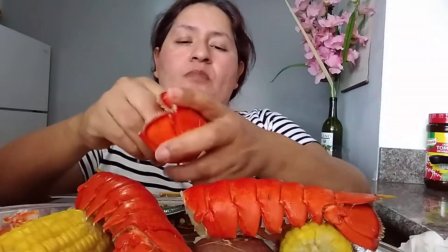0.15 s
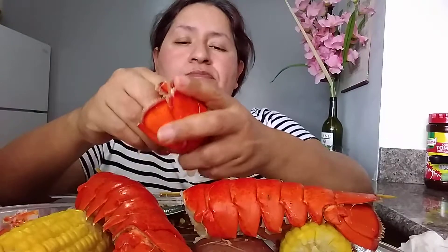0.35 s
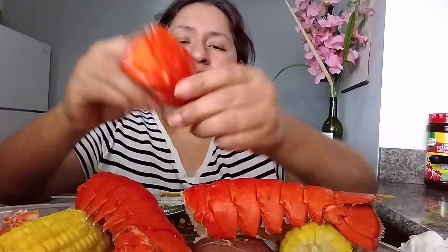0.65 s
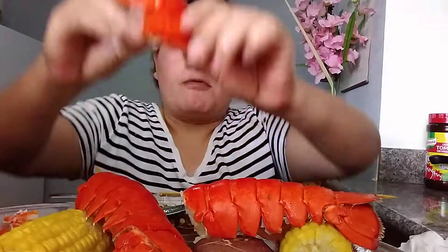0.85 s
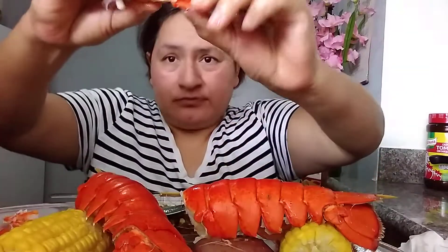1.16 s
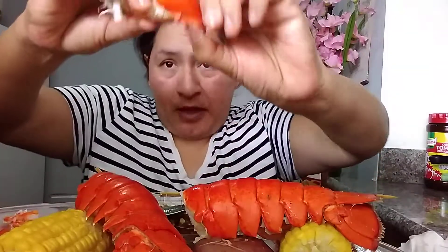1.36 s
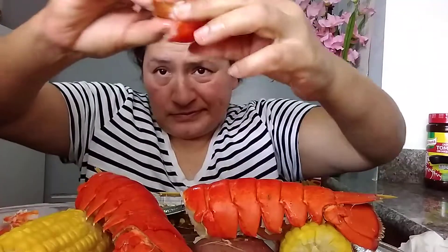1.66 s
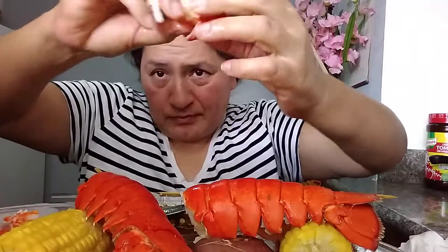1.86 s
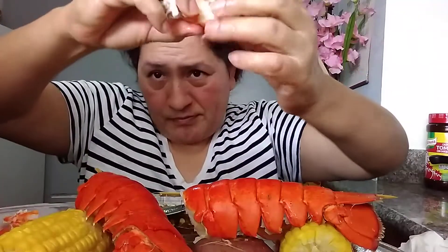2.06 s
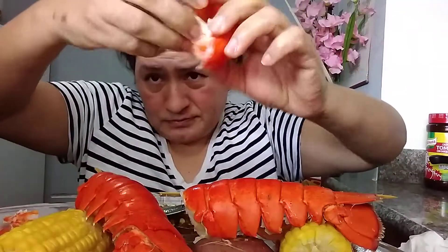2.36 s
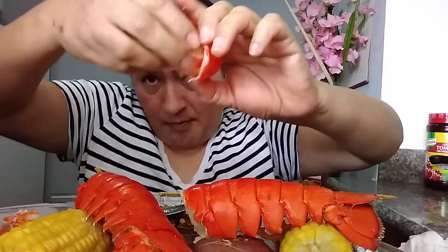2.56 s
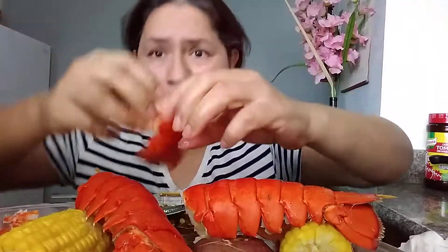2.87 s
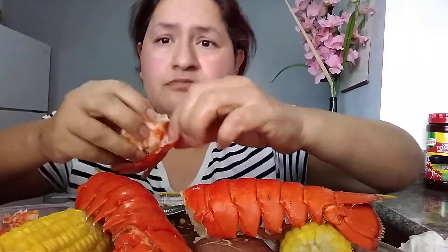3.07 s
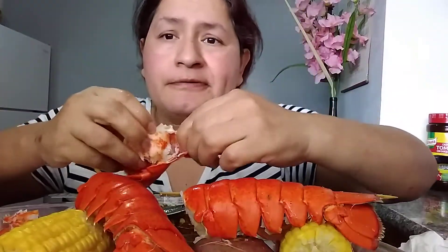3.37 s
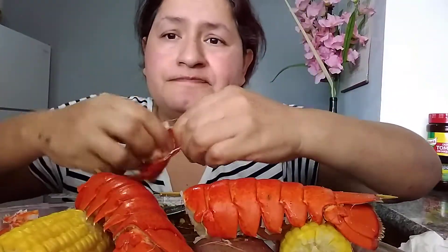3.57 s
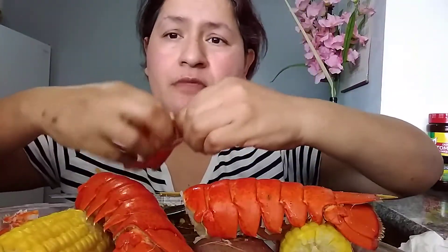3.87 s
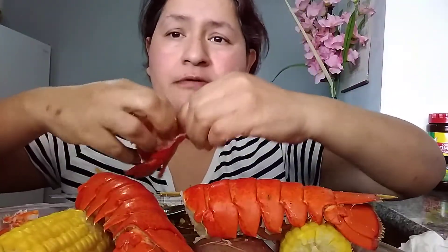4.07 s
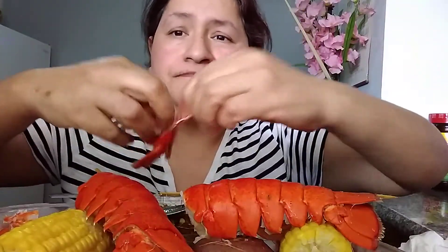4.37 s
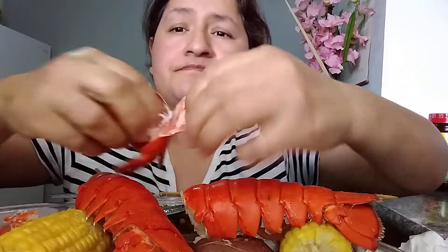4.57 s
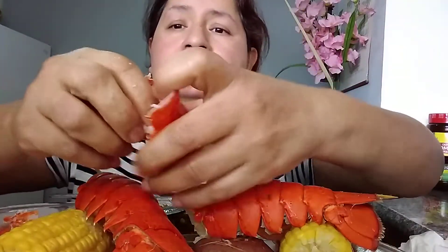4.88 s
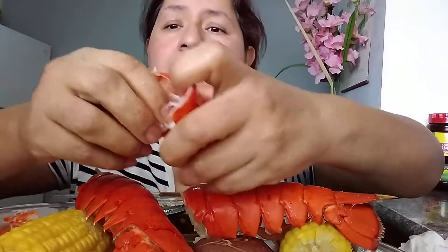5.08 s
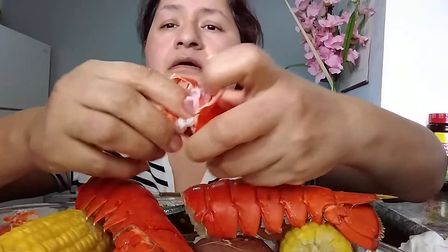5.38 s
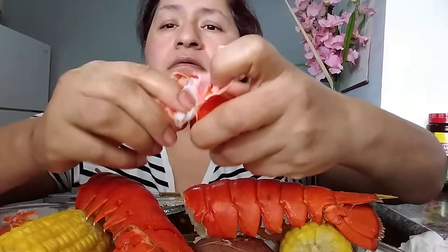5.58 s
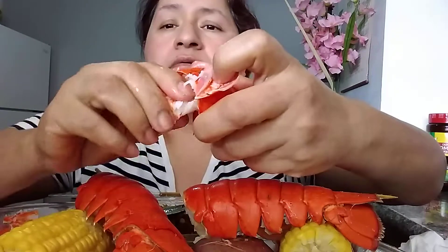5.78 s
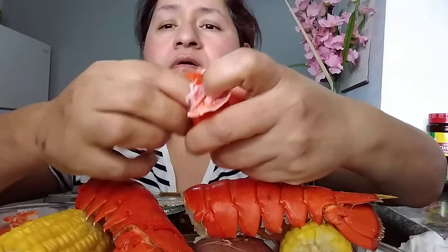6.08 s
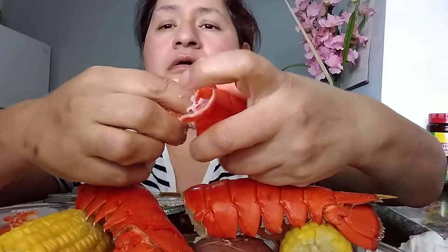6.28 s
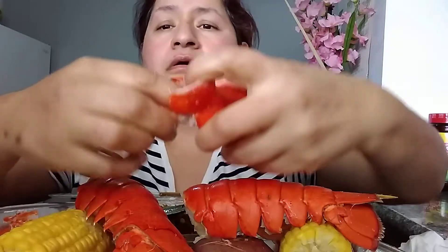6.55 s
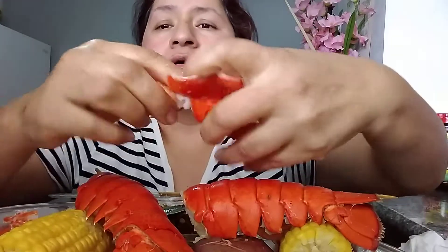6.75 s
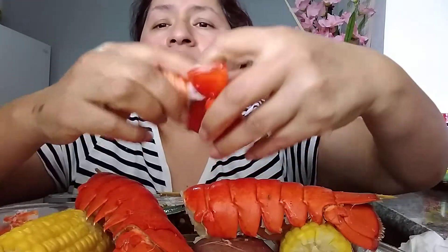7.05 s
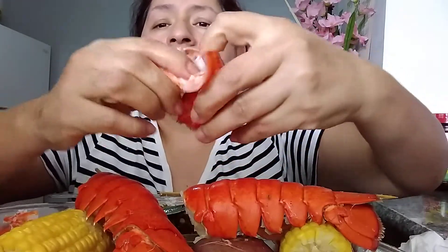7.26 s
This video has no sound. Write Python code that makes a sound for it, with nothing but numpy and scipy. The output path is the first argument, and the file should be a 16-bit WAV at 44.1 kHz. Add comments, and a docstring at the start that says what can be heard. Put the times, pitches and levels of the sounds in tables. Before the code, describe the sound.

A cooked lobster tail is broken open by hand close to the microphone, in a small kitchen with a faint, steady appliance hum. For the first three seconds the wet shell gives scattered small ticks, light crackles and soft rubs, while arms rustle faintly and press on the table with low, soft bumps. At 3.3 seconds comes the first crack, a short burst of tiny fractures with a hollow click. Another follows at 4.1 seconds. The loudest snaps land at 4.4 and 5.6 seconds, each a quick, bright, brittle cluster that slightly overloads the microphone and echoes briefly off hard walls. A smaller crack comes at 6 seconds, then more wet ticks, bunched around 6.9 seconds, and a last sharp crack at 7.2 seconds. The sound sits a little to the left.

```python
"""A cooked lobster tail is snapped open by hand, close to a phone in a small, faintly humming kitchen.
For three seconds the wet shell ticks, crackles and rubs, while the arms rustle and press on the table.
At 3.3 s comes the first crack: a burst of tiny fractures that rings a piece of shell.
The loudest snaps, at 4.4 and 5.6 s, overload the left microphone; hard walls answer briefly.
More ticks and two smaller cracks follow, the last at 7.2 s."""
import sys
import numpy as np
from scipy import signal
from scipy.fft import rfft, irfft
from scipy.io import wavfile
from scipy.ndimage import uniform_filter1d, minimum_filter1d

SR = 44100
rng = np.random.default_rng(int(sys.argv[2]) if len(sys.argv) > 2 else 0)


def int16_out(signal):
    """Quantize to a 16-bit WAV file."""
    q = np.round(np.clip(np.atleast_2d(signal).T, -1, 1) * 32767)
    wavfile.write(sys.argv[1], SR, q.astype(np.int16))


N = 327222
TIME = np.arange(N) / SR

# Levels compare the rows of one table; the functions set the final loudness.
# tone of the room's air: pitch_hz, level_db
AIR_TONE = [(59, -28), (100, -23), (260, -10.5), (302, -19.5), (461, -14), (621, -22.5), (910, -20),
            (1200, -20), (1310, -27), (1950, -24), (4380, -36.5), (8830, -35.5), (10000, -36), (11400, -36),
            (16000, -70.5)]
# steady hum of a kitchen appliance: pitch_hz, width_hz, level_db
HUM_BANDS = [(122, 33, -74), (1025, 230, -76.5)]
# stereo spread of the background: pitch_hz, side_minus_mid_db, left_minus_right_db
STEREO_SPREAD = [(60, 2, 0), (200, 11, 5.5), (700, 2.5, 4.5), (1300, -3.5, 6), (3956, 0.5, 1.5),
                 (10000, 0.5, 3.5)]
# tone of the arm rumble: pitch_hz, level_db
ARM_TONE = [(25, -13), (45, -15), (62, -1.5), (85, -7.5), (125, 2), (180, -8), (300, -24), (700, -28),
            (2000, -56.5)]
# strength of the arm rumble: time_s, level_db
ARM_LEVELS = [(0.0, -68.5), (0.58, -72.5), (0.87, -67), (1.59, -73.5), (2.27, -73), (2.64, -71.5),
              (2.79, -70.5), (3.86, -67.5), (5.04, -74.5), (5.95, -71), (7.07, -72.5), (7.42, -69.5)]
# elbows and forearms pressing on the table: middle_s, length_s, pitch_hz, level_db
TABLE_BUMPS = [(.15, 0.37, 220, -61), (.82, 0.14, 73, -51), (1.32, 0.15, 61.4, -55),
               (1.92, 0.098, 67.5, -47), (2.52, .22, 61, -46), (2.81, 0.072, 68, -48), (3.18, .3, 110, -51),
               (3.9, 0.63, 118.5, -52), (5.65, 0.34, 192, -59.5)]
# fingers and meat sliding on the shell: middle_s, length_s, pitch_hz, level_db
SHELL_RUBS = [(0.028, 0.079, 7000, -62.5), (0.16, 0.38, 13100, -76), (0.191, 0.088, 3700, -68.5),
              (0.206, 0.069, 1590, -68.5), (0.4, 0.34, 290, -75), (0.426, 0.029, 3250, -62),
              (0.778, 0.22, 880, -69), (1.051, 0.065, 680, -62), (1.218, 0.048, 6600, -64.5),
              (1.29, 0.062, 740, -61.5), (1.373, 0.1, 520, -62), (1.718, 0.094, 425, -69),
              (2.05, 0.24, 725, -74.5), (2.618, 0.1, 543, -68), (2.952, 0.054, 480, -63),
              (3.175, 0.026, 6000, -61.5), (3.297, 0.032, 4000, -53.5), (3.463, 0.068, 11700, -68),
              (4.29, 0.21, 9350, -69.5), (4.903, 0.039, 1150, -65), (5.214, 0.09, 13870, -68.5),
              (5.225, 0.06, 6390, -69.5), (5.25, 0.069, 446, -68.5), (5.35, 0.073, 3800, -62.5),
              (5.446, 0.031, 13500, -69), (6.419, 0.3, 2920, -76), (6.92, 0.088, 7500, -63.5),
              (7.346, 0.16, 251, -62.5)]
# tone of the peeling meat: pitch_hz, level_db
CRACKLE_TONE = [(1000, -34.5), (3000, -16), (6000, 5.5), (9000, 4.5), (12000, 0), (16000, -4)]
# resonances of the hollow shell: pitch_hz, width_hz, boost_db
SHELL_RESONANCES = [(415, 100, -4), (1900, 670, 0), (3380, 1100, 8.5), (5950, 450, 4)]
# small wet ticks: start_s, level_db, fracture_ms, pitch_hz, fall_db_per_octave
WET_TICKS = [(0.0044, -46, 2.7, 7800, 7.5), (0.023, -55, 3.3, 8650, 7.5), (0.282, -59.5, 1.6, 12100, 5.5),
             (0.3709, -54, 2.5, 3500, 3.5), (0.4255, -49.5, 1, 3080, 2.5), (0.5912, -49.5, 2.9, 6040, 26),
             (0.6345, -49.5, 8.6, 6600, 23), (0.754, -40.5, 2.6, 14100, 37.5), (0.991, -54.5, 15, 8450, 2),
             (1.1787, -49, 2.4, 3320, 5.5), (1.3491, -38.5, 3.7, 7300, 30), (1.366, -43, 1.7, 11300, 17),
             (1.447, -61, 2, 10900, 3.5), (1.6641, -63.5, 1.4, 13500, 1), (2.173, -51.5, 9.4, 11900, 10),
             (2.7536, -59.5, 4.1, 13500, 2), (2.865, -51, 5.2, 11600, 13), (3.1708, -46.5, 5.5, 14000, 22),
             (3.257, -50, 3.4, 3220, 3), (3.2794, -37, 1.6, 4500, 9), (3.702, -55.5, 9, 12700, 6),
             (3.9509, -43, 4, 8850, 8), (4.043, -51, 2.3, 11900, 10.5), (4.6641, -42, 1.4, 4570, 19.5),
             (5.141, -58, 1.6, 13100, 7.5), (5.2058, -50.5, 1.5, 4250, 14), (5.2739, -41, 2, 14700, 48),
             (5.3081, -42.5, 0.63, 3340, 21), (5.4221, -51.5, 1.64, 14330, 13.5),
             (6.0692, -36, 1.3, 11300, 17), (6.2132, -45, 1.1, 12360, 5), (6.4564, -50.5, 3.1, 12000, 19),
             (6.864, -39.5, 2.4, 8400, 17.5), (6.8914, -40, 2.1, 12500, 12), (6.9106, -37.5, 5.6, 8630, 14),
             (7.0446, -55.5, 1.8, 11000, 7)]
# pieces of shell that spring free: start_s, pitch_hz, fade_s (to fall 60 dB), level_db
RINGING_PIECES = [(3.3358, 322, 0.036, -40.5), (3.336, 3174, 0.014, -21.5), (4.1072, 2880, 0.0052, -29),
                  (4.3719, 370, 0.026, -40), (4.3733, 2160, 0.0052, -12), (4.3752, 2340, 0.073, -28),
                  (4.379, 4300, 0.022, -28.5), (5.6263, 734, 0.025, -35.5), (5.6265, 3260, 0.011, -10.5),
                  (5.6272, 231.4, 0.052, -45), (3.3366, 2030, .014, -27), (7.1982, 3600, 0.017, -26.5)]
# big cracks: start_s, level_db, fracture_ms, ring_hz, ring_db, body_db, shell_wall_db
# (body and shell wall are set against the sizzle at 9 kHz)
BIG_CRACKS = [(3.3356, -19.5, 1.5, 9300, 2, 0.5, 5), (4.1, -13.5, 0.63, 2127, 16.5, -16, -0.5),
              (4.1082, -12.5, 0.73, 7990, 7.5, -5, 2.5), (4.3727, 2.5, 0.4, 10300, 7.5, -10.5, -3.5),
              (4.375, -2.5, 0.41, 9700, 10, -22.5, -10), (4.378, -5, 2.4, 9400, 9.5, -16.5, -11.5),
              (4.3835, -16.5, 1, 2386, 12, -9, -3.5), (4.4076, -11, .8, 7000, 9, -13.5, -0.5),
              (4.4127, -2, 0.71, 4964, 5, -20, -4), (5.6108, -8.5, 0.99, 5950, 3.5, -11, -5),
              (5.625, -11, 1.6, 3300, 11, -26.5, -4.5), (5.626, 3.5, 2.4, 3320, 6, -16, -10),
              (5.6324, 0, 2, 9880, 8.5, -28, -11), (6.0152, -14.5, 0.77, 5160, 9.5, -29.5, -12.5),
              (7.1982, -9, 0.32, 5090, 10, -28, -1)]
# tone of the left and the right microphone: pitch_hz, gain_db
LEFT_MIC = [(40, -26), (120, -2), (350, -0.5), (2000, 5), (4200, 1.5), (7000, 3.5), (8400, 9), (9800, 11.5),
            (11000, 5), (13000, 3), (16000, -8.5)]
RIGHT_MIC = [(40, -30.5), (120, -7), (400, -16.5), (1200, -3), (2400, -2.5), (5000, -1.5), (7500, -6.5),
             (9000, -5), (10500, -13.5), (13000, -10), (16000, -10.5)]

# broad ranges in which the shell sounds
BODY_HZ, PLATE_HZ, EDGE_HZ, SIZZLE_HZ, SPLINTER_HZ = 700, 2780, 5420, 9000, 13500


def undb(db):
    """Turn decibels into a gain."""
    return 10 ** (np.asarray(db) / 20)


def unit(x):
    """Scale a sound to an average (rms) level of 1."""
    return x / np.sqrt(np.mean(x ** 2))


def contour(points, size):
    """Join (Hz, dB) points into a tone curve over all frequencies."""
    hz, db = np.transpose(points)
    return np.interp(np.log(np.arange(size // 2 + 1) * SR / size + 1), np.log(hz), db)


def resonance(hz, width_hz, size):
    """A bell-shaped curve of height 1 around one frequency."""
    return 1 / (1 + (2 * (np.arange(size // 2 + 1) * SR / size - hz) / width_hz) ** 2)


def colour(x, db):
    """Filter by a tone curve so that the ringing comes after each click, not before."""
    size = len(x)
    cepstrum = irfft(np.log(undb(db)), size)
    cepstrum[1:size // 2] *= 2
    cepstrum[size // 2 + 1:] = 0
    return irfft(rfft(x) * np.exp(rfft(cepstrum)), size)


def add(track, start_s, sound):
    """Mix a sound into a track at a given time."""
    start = max(int(start_s * SR), 0)
    part = sound[..., :max(N - start, 0)]
    track[..., start:start + part.shape[-1]] += part


def background(gain):
    """Noise from all around; its bass tends to push one microphone while pulling the other."""
    spread = np.array(STEREO_SPREAD)
    side_gain = undb(contour(spread[:, :2], N))
    pan = undb(contour(spread[:, ::2], N) / 2)
    mid, side = rfft(rng.standard_normal((2, N))) * gain / np.hypot(1, side_gain)
    return unit(irfft([(mid + side * side_gain) * pan, (mid - side * side_gain) / pan], N))


def room_hum(air_db=-70):
    """An appliance hums in narrow bands of noise over the soft hiss of the air."""
    hum = sum(undb(db) * background(resonance(hz, width, N)) for hz, width, db in HUM_BANDS)
    return hum + undb(air_db) * background(undb(contour(AIR_TONE, N)))


def arm_rumble(gain_db=7, sway_db=1.5, sway_points=90):
    """Moving arms make a low rustle whose level wanders."""
    sway = np.interp(TIME, np.linspace(0, TIME[-1], sway_points), rng.standard_normal(sway_points))
    level_db = np.interp(TIME, *np.transpose(ARM_LEVELS)) + sway_db * sway
    return background(undb(contour(ARM_TONE, N))) * undb(level_db + gain_db)


def echo_pattern(lag, mic, early_db=-7, late_db=-7, early_s=.16, walls_s=.3, treble_s=.26, size=16384):
    """A click reaches a microphone directly, then off hands and counter, then off the walls."""
    t = np.arange(size) / SR
    near, far, chance = rng.standard_normal((3, size))
    early = near * np.abs(chance) * undb(-60 * t / early_s) * (t > .0012)
    dull = signal.sosfilt(signal.butter(4, 11000, fs=SR, output="sos"), far)
    bright = signal.sosfilt(signal.butter(4, 11000, "high", fs=SR, output="sos"), rng.standard_normal(size))
    late = dull * undb(-60 * t / walls_s) + bright * undb(-60 * t / treble_s)
    late *= 1 - np.exp(-t / 0.0027)
    response = (undb(early_db) * unit(early) + undb(late_db) * unit(late)) / np.sqrt(size)
    response = colour(response, contour([(500, -2), (3000, 0.014)], size))  # slightly less bass
    response[lag] += 1  # the direct sound, lag samples late
    return colour(response, contour(mic, size))


def kitchen(x, lag, mic, block=14000):
    """The shell keeps moving in the hands, so each block of sound gets new echoes."""
    out = np.zeros(N)
    for start in range(0, N, block):
        add(out, start / SR, signal.fftconvolve(x[start:start + block], echo_pattern(lag, mic)))
    return out


def friction(slides, width_share, grain_db, grain_ms, size=32768):
    """Sliding surfaces grip and slip unevenly, making short swells of noise around a pitch."""
    out = np.zeros(N)
    t = (np.arange(size) - size // 2) / SR
    for middle_s, length_s, hz, db in slides:
        hiss = irfft(rfft(rng.standard_normal(size)) * resonance(hz, width_share * hz, size))
        roughness = uniform_filter1d(rng.standard_normal(size), int(grain_ms * SR / 1000) + 1)
        grip = undb(grain_db * unit(roughness))
        swell = np.exp(-2 * (t / length_s) ** 2)
        slide = unit(hiss * grip * swell) * np.sqrt(np.mean(swell ** 2)) * undb(db)
        add(out, middle_s + t[0], slide[t >= -middle_s])
    return out


def crackle(clicks_per_s=2000, gain_db=-14, rise_s=0.0022, fall_s=0.014, points=5000):
    """Moist meat peels off in a spray of tiny clicks around each listed tick, following its sizzle."""
    t = np.linspace(0, TIME[-1], points)
    power = 0
    for start_s, db, _, hz, fall_db in WET_TICKS:
        sizzle_db = db - fall_db * abs(np.log2(SIZZLE_HZ / hz))
        swell = np.exp(np.minimum((t - start_s) / rise_s, (start_s - t) / fall_s).clip(-40, 0))
        power = power + undb(2 * sizzle_db) * swell
    clicks = (rng.random(N) < clicks_per_s / SR) * rng.standard_normal(N)
    clicks *= undb(np.minimum(rng.exponential(size=N), 4))  # some are up to 4 dB stronger
    spray = unit(colour(clicks, contour(CRACKLE_TONE, N)))
    return spray * np.interp(TIME, t, np.sqrt(power)) * undb(gain_db)


def fracture(ms, grain_db=8, size=4096):
    """A crack runs through the shell as a dying chain of tiny, uneven breaks."""
    age = np.arange(size) / SR / (ms / 1000)
    breaks, strength = rng.standard_normal((2, size))
    spectrum = rfft(breaks * undb(grain_db * uniform_filter1d(strength, 4)) * np.exp(-age / 2))
    spectrum /= np.sqrt(uniform_filter1d(np.abs(spectrum) ** 2, size=100))  # even out the tone
    return irfft(spectrum) * (np.arange(size) < size // 2)


def snap(ms, ring_hz, ring_db, tone, width_share=0.17):
    """One fracture sounds through the hollow shell and the piece that breaks."""
    burst = fracture(ms)
    size = len(burst)
    piece_db = ring_db * resonance(ring_hz, width_share * ring_hz, size)
    shell_db = sum(db * resonance(hz, width, size) for hz, width, db in SHELL_RESONANCES)
    return colour(burst, contour(tone, size) + piece_db + shell_db)


def tick(ms, pitch_hz, fall_db):
    """A small snap, strongest at its own pitch and fall_db weaker per octave on either side."""
    tone = [(hz, -fall_db * abs(np.log2(hz / pitch_hz))) for hz in sorted([700, pitch_hz, 16000])]
    return snap(ms, pitch_hz, ring_db=2, tone=tone)


def ticks(gain_db=24, strays_per_s=5.1, stray_db=-68, spread_db=5, stray_hz=9500):
    """Small joints and wet membranes let go under the fingers, with fainter stray ticks between."""
    out = np.zeros(N)
    for start_s, db, ms, hz, fall_db in WET_TICKS:
        add(out, start_s, undb(gain_db + db) * tick(ms, hz, fall_db))
    for when, strength, pitch in rng.uniform(-0.81, 1, (int(strays_per_s * TIME[-1]), 3)):
        stray = tick(ms=3, pitch_hz=stray_hz * 2 ** (pitch / 4), fall_db=10.5)
        add(out, abs(when) * TIME[-1], undb(gain_db + stray_db + spread_db * strength) * stray)
    return out


def rings(bend=0.023, size=8192):
    """Each freed piece rings with one fading note that sags as the grip relaxes."""
    out = np.zeros(N)
    t = np.arange(size) / SR
    for start_s, hz, fade_s, db in RINGING_PIECES:
        pitch_hz = hz * (1 + bend * np.exp(-6 * t / fade_s))
        phase = 2 * np.pi * np.cumsum(pitch_hz) / SR
        add(out, start_s, np.cos(phase) * undb(db - 60 * t / fade_s))
    return out


def cracks(gain_db=11, right_db=-2.5):
    """The shell gives way in quick snaps; thicker pieces sound more of its wall and hollow body."""
    out = np.zeros(N)
    for start_s, db, ms, ring_hz, ring_db, body_db, wall_db in BIG_CRACKS:
        tone = [(150, body_db - 6), (BODY_HZ, body_db), (2 * BODY_HZ, body_db + 1.5),
                (PLATE_HZ, wall_db - 7.5), (EDGE_HZ, wall_db + 1.5), (SIZZLE_HZ, 0), (SPLINTER_HZ, -1.5)]
        add(out, start_s, undb(gain_db + db) * snap(ms, ring_hz, ring_db, tone))
    return out * undb([[0], [right_db]])


def widen(pair, side_db=3, below_hz=450):
    """The phone widens the stereo by lifting the bass of the difference between its microphones."""
    side = signal.sosfilt(signal.butter(1, below_hz, fs=SR, output="sos"), pair[0] - pair[1]) / 2
    return pair + undb(side_db) * side * np.array([[1], [-1]])


def scene(table_db=1, ring_room_db=-6, ring_right_db=-4):
    """Over room hum, arms and table, the shell sounds through the kitchen to both microphones."""
    bumps = friction(TABLE_BUMPS, width_share=0.31, grain_db=4.5, grain_ms=10)
    table = bumps * undb(table_db) * np.array([[1], [-.6]])  # weaker and flipped on the right
    rubs = friction(SHELL_RUBS, width_share=.55, grain_db=6.5, grain_ms=6)
    pieces = rings()
    left, right = rubs + crackle() + ticks() + undb(ring_room_db) * pieces + cracks()
    shell = np.array([kitchen(left, lag=8, mic=LEFT_MIC), kitchen(right, lag=0, mic=RIGHT_MIC)])
    shell += pieces * undb([[0], [ring_right_db]])  # the pieces face the phone and also ring straight in
    return room_hum() + arm_rumble() + table + widen(shell)


def record(dry, bass_hz=35, top_hz=15900):
    """A very fast limiter turns the loudest snaps down to full scale; deep bass and the top are cut."""
    needed_gain = 1 / np.maximum(np.abs(dry), 1)
    gain = uniform_filter1d(minimum_filter1d(needed_gain, size=15), size=15)
    limited = signal.sosfilt(signal.butter(2, bass_hz, "high", fs=SR, output="sos"), dry * gain)
    return signal.sosfilt(signal.ellip(10, .1, 70, top_hz, fs=SR, output="sos"), limited)


dry = scene()
out = record(dry)
int16_out(out)
```